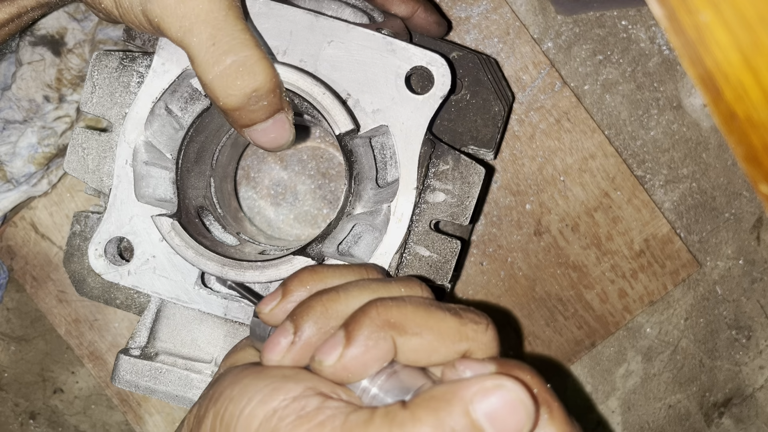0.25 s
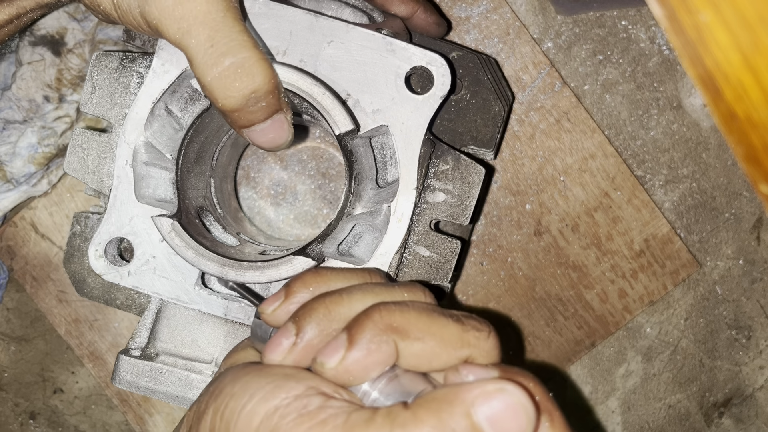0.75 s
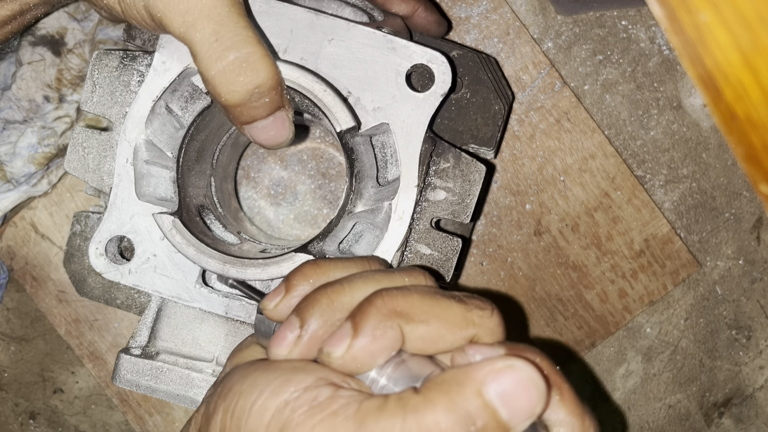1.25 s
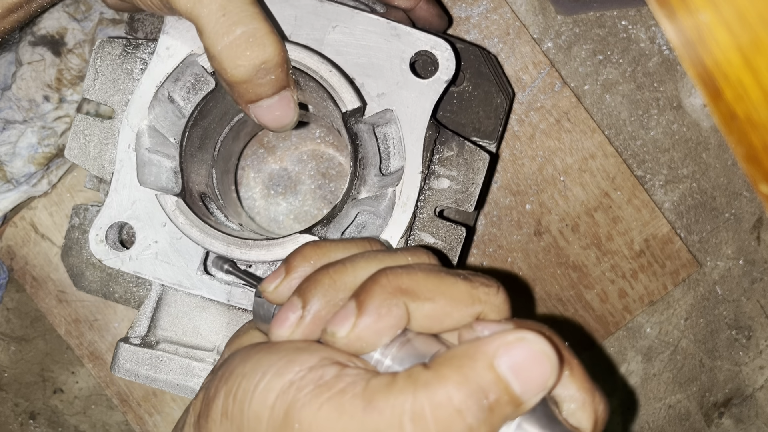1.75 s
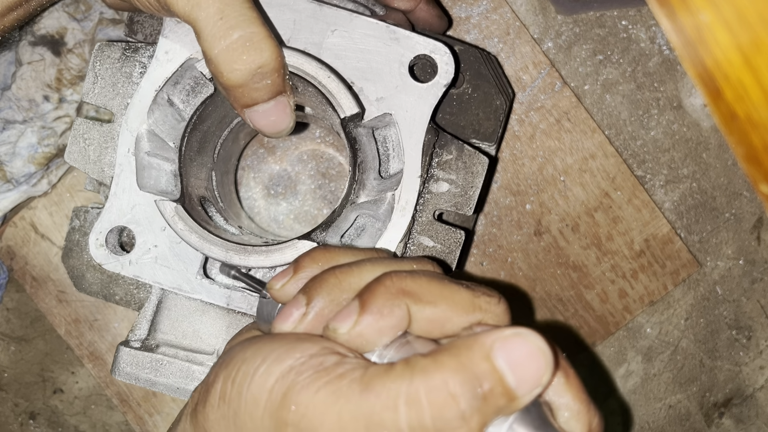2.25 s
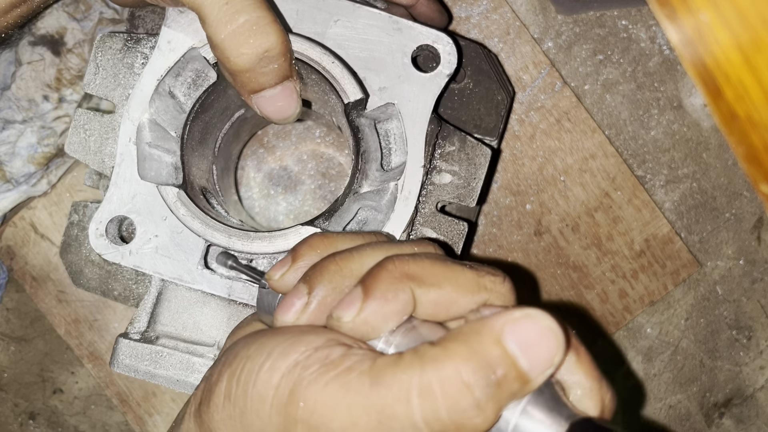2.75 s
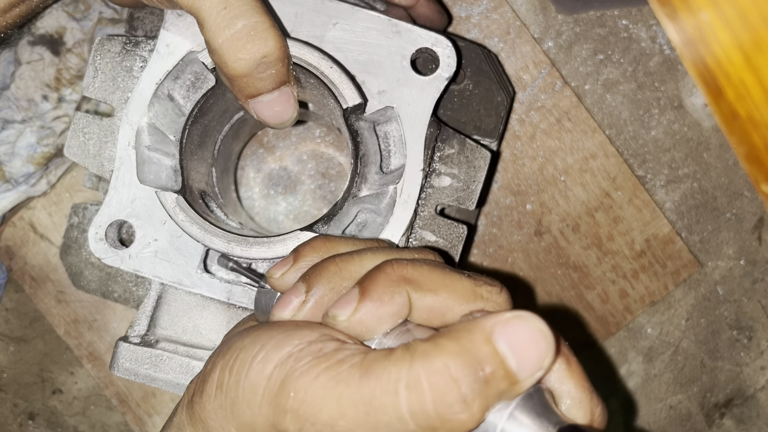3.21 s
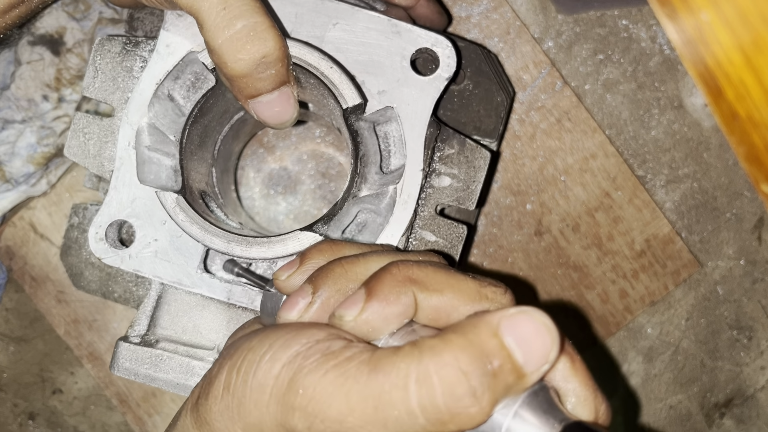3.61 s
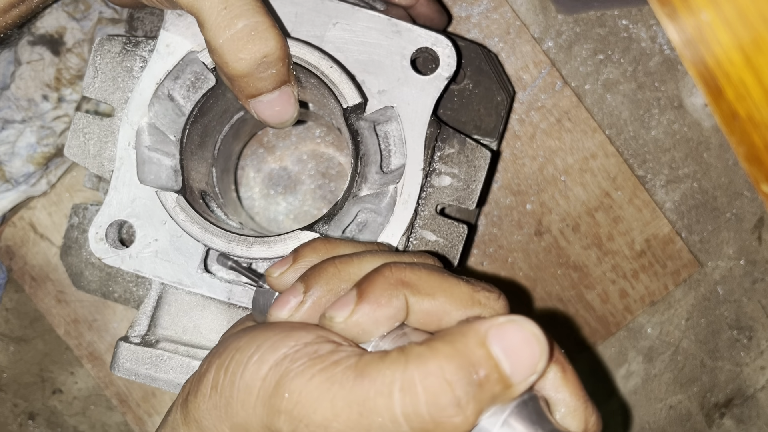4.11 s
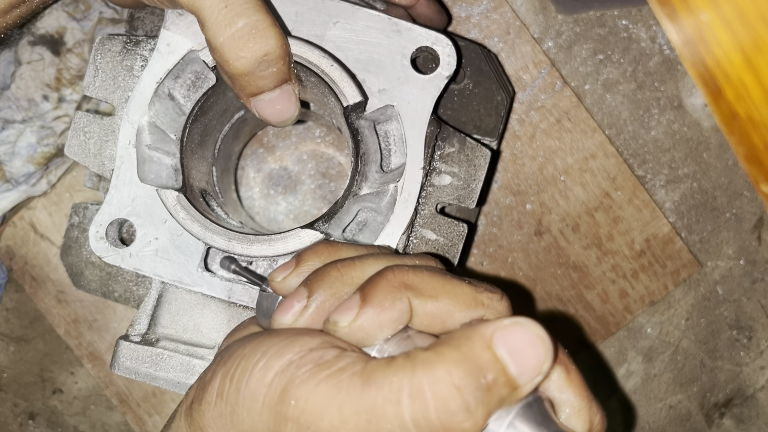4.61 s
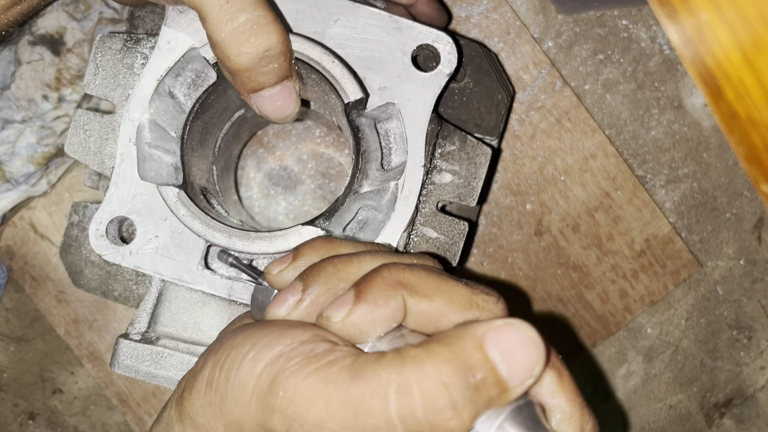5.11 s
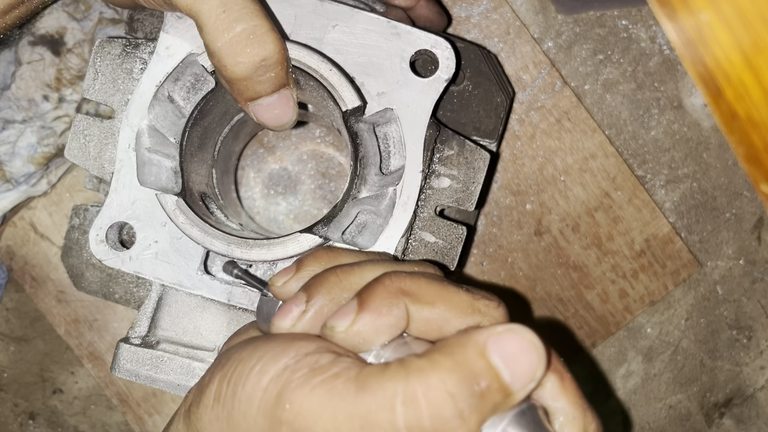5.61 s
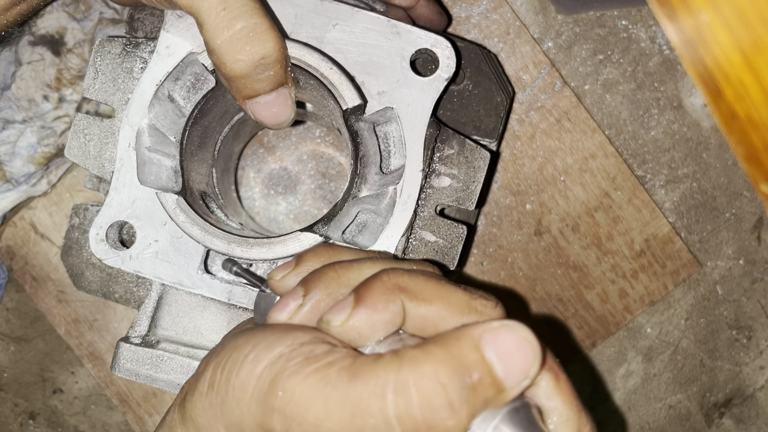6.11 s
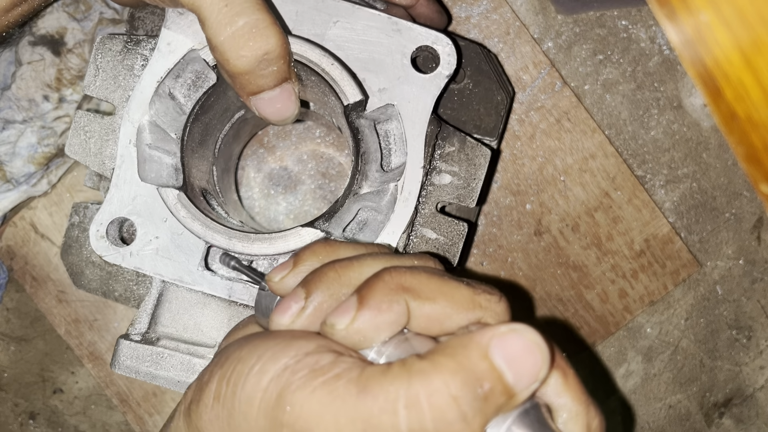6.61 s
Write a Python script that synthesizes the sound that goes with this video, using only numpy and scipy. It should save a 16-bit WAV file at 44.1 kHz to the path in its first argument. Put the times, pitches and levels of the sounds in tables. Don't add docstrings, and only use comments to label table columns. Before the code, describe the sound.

Harsh gritty metal grinding comes in short bursts, ringing through a cast cylinder; the motor's pitch wavers, and soft bumps and quiet whirr fill the pauses.

```python
import sys
import numpy as np
from scipy import signal
from scipy.fft import rfft, irfft, next_fast_len
from scipy.io import wavfile
from scipy.ndimage import uniform_filter1d

SR = 44100
rng = np.random.default_rng(int(sys.argv[2]) if len(sys.argv) > 2 else 0)


def amplitude_ratio(level_db):
    exponent = np.asarray(level_db, float) / 20
    return 10 ** exponent


def bounce(signal):
    frames = np.transpose(np.atleast_2d(signal))
    limited = np.clip(frames, -1, 1)
    pcm = np.round(limited * 32767).astype(np.int16)
    wavfile.write(sys.argv[1], SR, pcm)


N = 302526
TIME = np.arange(N) / SR

# (time [s], shaft speed [turns/s])
SHAFT_SPEED = [(0, 92), (.73, 75), (1.2, 60), (1.5, 80), (2.05, 114), (2.75, 121.5), (2.95, 112),
               (3.13, 109), (3.55, 93.5), (3.8, 96), (4.18, 88.5), (4.55, 75), (4.91, 106.5), (5.12, 119),
               (5.68, 128.5), (6.29, 99.3), (6.5, 98), (6.86, 86)]
# (touch [s], first bite [dB], settled [s], full bite [dB], lift [s])
PASSES = [
    (0, -34, .17, -23, 1.05),
    (1.241, -39, 1.244, -40, 1.25),
    (1.33, -47, 1.375, -37, 1.52),
    (1.847, -26, 2.0, -18.5, 2.43),
    (2.879, -31, 2.92, -21.5, 3.535),
    (3.775, -40, 3.86, -26.5, 4.46),
    (4.793, -36, 5.04, -19.5, 5.48),
    (5.712, -33, 5.86, -21.5, 6.33),
    (6.617, -39, 6.72, -23, 6.9),
]
LAND_S, LIFT_DB_PER_S = .005, 283
# (time [s], change [dB], half width [s])
LEANS = [(.09, -0.5, 0.035), (.218, 5, 0.012), (.3, 2.5, 0.057), (.39, -3.5, 0.076), (.57, 2.5, 0.12),
         (.824, 3.5, 0.038), (1.05, -4, 0.19), (1.42, -3.5, 0.012), (2.03, 1.5, 0.1), (2.21, -3, 0.016),
         (2.245, 2.5, 0.029), (2.95, -1.5, 0.038), (3.08, 2.5, 0.053), (3.35, 1.5, 0.065),
         (3.62, 9.5, 0.044), (3.98, 3, 0.026), (4.12, 5.5, 0.11), (4.53, 8, 0.022), (4.264, -3.5, .02),
         (4.3, 6, 0.049), (4.41, -0.5, 0.052), (5.23, -4, 0.014), (5.32, 4, 0.066), (5.415, -2, .02),
         (5.79, -5.5, 0.033), (6.0, 2, 0.062), (6.03, -4.5, 0.016), (6.25, 2, 0.026), (6.79, 0, 0.023),
         (6.84, -2.5, 0.022)]
# (time [s], half width [s], bore hum [dB], bench drone [dB], wall ring [dB])
SEATS = [(0.188, 0.02, -10, -15, 3), (0.251, 0.016, -6.5, -27, 2), (.35, 0.075, -10, -14, -11),
         (.8, 0.12, -7, -3.5, -6), (.9, 0.047, -16, -8, -27), (1.04, 0.094, -7.5, -12, 4.5),
         (2.24, 0.02, -12, -14.5, -17), (2.32, 0.023, -31, -40, -1), (2.38, 0.081, -11.5, -21, -12),
         (3.24, 0.047, -31, -41, -10), (3.35, 0.03, -11, -35, -26), (3.51, 0.11, -8, -41, -4.5),
         (3.9, .04, -16, -39, -29), (4.265, 0.035, -7, -25, -1), (4.38, 0.064, -1, -29, -5),
         (5.1, 0.024, -36, -16.5, -6.5), (5.28, 0.065, -38, -11, 1.5), (5.39, 0.038, -4.5, -12, -30),
         (5.5, 0.082, -17, -11, -18), (5.74, 0.054, -5.5, -6, -4.5), (5.93, 0.025, -15, -24, -27),
         (6.04, 0.09, -16, -17, -13), (6.25, 0.13, -3, -9.5, -17), (6.36, 0.061, -27, -15, 2)]
# (bore [dB], bench [dB], wall [dB])
LOOSE_COUPLING = (-23, -33, -15)
# (frequency [Hz], density [dB per Hz])
SCRAPE = [(500, -13), (1900, -1.5), (2500, -4), (3500, -0.5), (4400, 1), (5200, 1), (6000, -9.5),
          (7400, 3.5), (8500, -94), (9500, -12), (11000, -16.5), (12500, -18.5), (14500, -13.5),
          (15700, -5.5)]
# (frequency [Hz], width [Hz], level [dB])
RIM = [(2146, 12, 11), (2300, 120, -8)]
CASTING = [(2920, 36, -8), (3462, 190, -16), (3686, 26, -6), (4170, 156, -12), (4488, 18, 5),
           (4966, 18, 1.5), (5350, 28, -3), (5680, 47, -17), (6175, 15, -11), (6307, 13, -7),
           (6536, 19, -1), (7292, 40, -2.5), (7425, 40, -2), (7480, 9.7, -71), (8020, 9.3, -75),
           (8460, 21, -55), (8360, 72, 2), (9905, 65, -22.5), (10465, 50, -13.5), (11040, 45, -4)]
COOLING_FINS = [(7850, 70, -1), (8030, 60, 0), (8800, 130, -5), (9250, 110, -5), (9960, 150, -5),
                (14750, 90, -11), (15600, 200, -8)]
SHARP_EDGE = [(4968, 16, 19), (5136, 30, 11), (5350, 50, 10), (5448, 12, 12), (5250, 600, 5)]
WALL = [(2693, 7, 0)]
BORE = [(1290, 81, 3.5), (1440, 150, 14.5), (1690, 210, -2), (3420, 350, -3.5)]
BENCH = [(859.6, 31, 0), (949, 30, -4.5)]
# (start [s], end [s], frequency [Hz], level [dB])
SQUEAK = (5.62, 5.705, 2470, -46)
# (frequency [Hz], density [dB per Hz])
WHIRR = [(900, -8), (2000, -2), (3000, -3), (5000, 0), (6000, -4), (7300, 0), (9000, -8), (11000, -10),
         (12500, -8), (15500, -13)]
# (time [s], peak [dB], start frequency [Hz], t60 [s])
BUMPS = [
    (4.492, -27, 90, .16),
    (4.520, -30, 130, .08),
    (4.547, -21, 260, .12),
    (.455, -29, 90, .10),
]
# (frequency [Hz], density [dB per Hz])
HAND = [(22, -40), (40, -21), (60, -1), (110, -5), (150, -8.5), (220, -35)]
# (time [s], rise [dB], half width [s])
STIRS = [(.25, 10, 0.061), (.44, 13, 0.083), (.92, 10, 0.16), (1.5, 9.5, 0.29), (1.72, 9, 0.043),
         (2.02, 10, 0.062), (2.55, 5, .1), (3.35, 7, 0.065), (3.52, 9, 0.065), (3.65, 12, 0.04),
         (4.33, 7, 0.11), (4.55, 9, 0.032), (4.95, 11, 0.16), (5.3, 13, 0.087), (5.7, 11.5, 0.24),
         (6.0, 4, .04), (6.68, 10, 0.025)]
STILL_DB = -53.5
# (frequency [Hz], density [dB per Hz])
SHOP = [(82, -70), (140, -12.5), (209, -8.5), (241, -10), (298, -10), (417, -1.5), (777, -10), (1250, -8),
        (2000, -25), (2600, -40), (4400, -120)]
# (time [s], change [dB], half width [s])
SWELLS = [
    (.2, 4, 0.11),
    (.76, 5.5, 0.02),
    (2.0, 3.5, 0.067),
    (2.29, -12, 0.12),
    (4.3, 0, .1),
    (4.9, 2.5, 0.1),
    (6.5, 5.5, 0.23),
]
SHOP_START_DB, SHOP_FADE_DB_PER_S = -35.5, 1.25
# (frequency [Hz], left lead [radians], left minus right [dB], common share [0-1])
STEREO = [(60, -.2, 0, .8), (220, .3, -1.3, .3), (400, 1.5, -.7, .65), (900, 1.4, 9, .4), (1250, 2.6, 3, .5),
          (1600, 3.9, .8, .6), (1750, 6.3, 1, .6), (3000, 7.2, 8, .7), (4600, 7.2, 8, .65),
          (6500, 5.1, 4, .7), (8600, 3.14, 0, .9), (11400, 0, 0, .9), (12800, 0, 0, .8),
          (14800, -3.14, 0, .9)]
# (from frequency [Hz], sum lost [share], difference lost [share])
HOLES = [(0, 0, 0), (1900, 0, .45), (2300, 0, .08), (2750, 0, 0), (7800, .4, 0), (8100, .98, 0),
         (8950, .4, 0), (9300, 0, 0), (10600, 0, .35), (11150, .05, 1), (12000, .22, 1), (13150, .2, .35),
         (14200, .6, .2), (14600, 1, .2)]
TOP_HZ = 15750


def burr(turns):
    starts = np.array(PASSES)[:, 0] - LAND_S
    bite = pressure()
    bore, bench, wall = seating()
    latest = np.maximum(np.searchsorted(starts, TIME, "right") - 1, 0)
    age = TIME - starts[latest]
    runout = np.clip(.06 * (-27 - bite), .2, .9) + 1.3 * np.exp(-np.abs(age) / .04)
    peal = bite + wall
    bite = bite + 1.0 * walk(40)

    knocks = flutes(turns, uneven_db=8.0, drift_db=4.5, scatter_db=2.0, slip=.045, count=15)
    tear = chips(spread_db=1.46)
    force = beat(turns, runout) * (tear + amplitude_ratio(-8) * knocks)
    hum = beat(turns, 1.1) * (knocks + amplitude_ratio(-10) * tear)

    scrape = level(colour(force, SCRAPE), -2.0)
    scrape = scrape + amplitude_ratio(-14) * ring(force, RIM, 1.4, 5.4)
    scrape = scrape + amplitude_ratio(-3) * ring(force, CASTING, 1.8, 9)
    scrape = scrape + amplitude_ratio(-7) * ring(force, COOLING_FINS, 2.5, 9)
    sizzle = np.exp(-(age / .3) ** 2)
    scrape = scrape + amplitude_ratio(-3) * sizzle * ring(force, SHARP_EDGE, 1.0, 9)

    wall_ring = ring(tear, WALL, 0.13, 14)
    bore_ring = ring(hum, BORE, 1.5, 7)
    bench_ring = ring(hum, BENCH, 1.0, 7)
    return (amplitude_ratio(bite) * scrape + amplitude_ratio(peal - 0.46) * wall_ring
            + amplitude_ratio(bite + bore + 2.5) * bore_ring + amplitude_ratio(bite + bench + 0.5) * bench_ring)


def flutes(turns, uneven_db, drift_db, scatter_db, slip, count):
    index = np.arange(int(turns[-1] * count))
    drift = uniform_filter1d(rng.standard_normal((N // 300, count)), size=19, axis=0) * np.sqrt(19)
    edge = amplitude_ratio(uneven_db * rng.standard_normal(count) + drift_db * drift).ravel()[:len(index)]
    knocks = np.zeros((2, N + 2))
    for row in knocks:
        late, uneven = rng.standard_normal((N // 20, 2))[:len(index)].T
        place = np.clip(np.interp(index + slip * late, turns * count, np.arange(N)), 0, N)
        whole = place.astype(int)
        size = edge * amplitude_ratio(scatter_db * uneven)
        np.add.at(row, whole, size * (1 - place % 1))
        np.add.at(row, whole + 1, size * (place % 1))
    knocks = knocks[:, :N]
    return level(knocks - uniform_filter1d(knocks, 200), 0)


def chips(spread_db):
    grains = rng.standard_normal((2, N))
    return level(grains * amplitude_ratio(spread_db * rng.exponential(size=(2, N))), 0)


def beat(turns, runout):
    return np.exp(runout * np.cos(2 * np.pi * turns)) / np.sqrt(np.i0(2 * runout))


def pressure():
    each = []
    for touch, first, settled, full, lift in PASSES:
        press = np.interp(TIME, [touch - LAND_S, touch, settled], [-90, first, full])
        each.append(press - LIFT_DB_PER_S * np.maximum(TIME - lift, 0))
    return np.max(each, axis=0) + swings(LEANS)


def seating():
    rows = np.array(SEATS)
    loose = amplitude_ratio(np.array(LOOSE_COUPLING))[:, None]
    seated = amplitude_ratio(rows[:, 2:].T) @ humps(rows[:, :2])
    return 20 * np.log10(loose + seated)


def ring(force, modes, wander_db, rate):
    out = 0
    for hz, width, db in modes:
        b, a = signal.iirpeak(hz, hz / width, fs=SR)
        out = out + signal.lfilter(b, a, force * amplitude_ratio(db + wander_db * walk(rate)))
    return level(out, 0)


def squeak():
    start, end, hz, db = SQUEAK
    fade = np.interp(TIME, [start, start + .02, end - .01, end], [0, 1, 1, 0])
    return amplitude_ratio(db) * fade * np.sin(2 * np.pi * hz * TIME)


def motor(turns):
    twice = 4 * np.pi * turns
    speed_db = 20 * np.log10(np.interp(TIME, *np.transpose(SHAFT_SPEED)) / 100)
    puffs = rng.standard_normal((2, N)) * np.exp(0.079 * np.cos(twice))
    whirr = level(colour(puffs, WHIRR), -46.5) * amplitude_ratio(1.34 * speed_db)
    hum = amplitude_ratio(-54.5 + 2 * walk(2.5)) * np.sin(twice)
    return whirr + hum


def bumps():
    out = np.zeros(N)
    case_hz = 60
    for s, db, hz, t60 in BUMPS:
        t = np.maximum(TIME - s, 0)
        cycles = case_hz * t + (hz - case_hz) * 0.0116 * (1 - np.exp(-t / 0.0079))
        out += amplitude_ratio(db - 60 * t / t60) * np.sin(2 * np.pi * cycles)
    return out


def shop():
    rumble = level(colour(rng.standard_normal((2, N)), SHOP), 1.0)
    stir = level(colour(rng.standard_normal((2, N)), HAND), 0.22)
    rumble_db = SHOP_START_DB - SHOP_FADE_DB_PER_S * TIME + swings(SWELLS) + 2.5 * walk(11)
    stir_db = STILL_DB + swings(STIRS) + 2 * walk(14)
    return rumble * amplitude_ratio(rumble_db) + stir * amplitude_ratio(stir_db)


def room(tool):
    t = TIME[:SR // 5]
    tail = rng.standard_normal((2, len(t))) * amplitude_ratio(-60 * t / .16) * (t > .004)
    return signal.fftconvolve(tool, tail / np.sqrt(np.sum(tail[0] ** 2)), axes=1)[:, :N]


def spread_stereo(pair):
    size = next_fast_len(N + 4096)
    hz = np.arange(size // 2 + 1) * SR / size
    near, other = rfft(pair, size)
    share = np.clip(along(STEREO, 3, hz), 0, 1)
    right = np.sqrt(share) * near + np.sqrt(1 - share) * other
    right = right * amplitude_ratio(-along(STEREO, 2, hz)) * np.exp(-1j * along(STEREO, 1, hz))
    return np.array([pair[0], irfft(right, size)[:N]])


def level(x, db):
    return x * amplitude_ratio(db) / np.sqrt(np.mean(x ** 2))


def along(table, column, hz):
    rows = np.array(table)
    return np.interp(np.log(hz + 1), np.log(rows[:, 0]), rows[:, column])


def colour(x, spectrum):
    size = next_fast_len(N + 4096)
    hz = np.arange(size // 2 + 1) * SR / size
    return irfft(rfft(x, size) * amplitude_ratio(along(spectrum, 1, hz)), size)[..., :N]


def walk(rate):
    k = int(SR / rate)
    held = np.repeat(rng.standard_normal(N // 400 + 1), k)[:N]
    return 1.41 * uniform_filter1d(uniform_filter1d(held, k), k)


def humps(rows):
    return np.array([np.exp(-((TIME - s) / width) ** 2) for s, width in rows])


def swings(table):
    rows = np.array(table)
    return rows[:, 1] @ humps(rows[:, ::2])


def scene():
    speed = np.interp(TIME, *np.transpose(SHAFT_SPEED)) * (1 + .004 * walk(14))
    turns = np.cumsum(speed) / SR
    tool = burr(turns) + squeak()
    return spread_stereo(tool + amplitude_ratio(-11) * room(tool) + motor(turns) + shop()) + bumps()


def roll_off(x):
    return signal.sosfilt(signal.butter(12, 15710, fs=SR, output="sos"), x)


def record(dry):
    left, right = np.tanh(1.398 * dry) / 1.164
    frames = dict(fs=SR, window="cosine", nperseg=2048, noverlap=1024)
    hz, t, bins = signal.stft(np.array([left + right, left - right]) / 2, **frames)
    holes = np.array(HOLES)
    lost = holes[np.searchsorted(holes[:, 0], hz, "right") - 1, 1:].T
    patches = rng.random((len(hz) // 8 + 1, len(t) // 3 + 1))
    luck = np.kron(patches, np.ones((8, 3)))[:len(hz), :len(t)]
    total, difference = signal.istft(bins * (luck > lost[..., None]), **frames)[1][:, :N]
    pair = np.array([total + difference, total - difference])
    top_cut = signal.ellip(8, .2, 70, TOP_HZ, fs=SR, output="sos")
    return roll_off(signal.sosfilt(top_cut, pair))


dry = scene()
out = record(dry)
bounce(out)
```